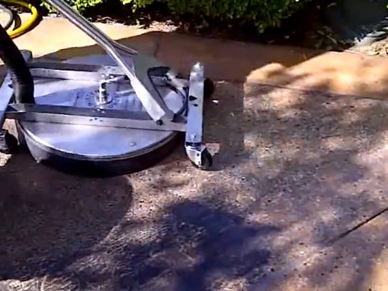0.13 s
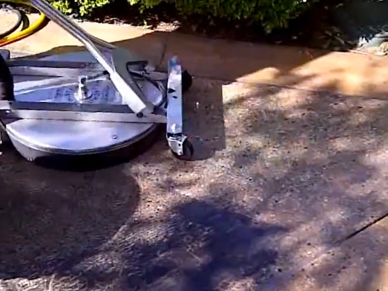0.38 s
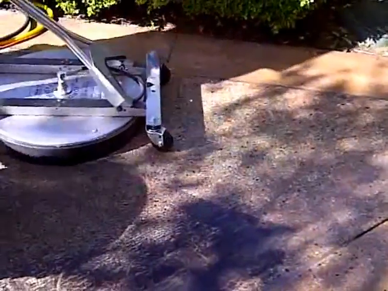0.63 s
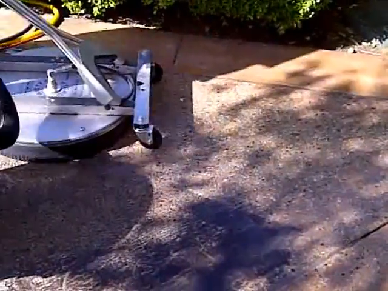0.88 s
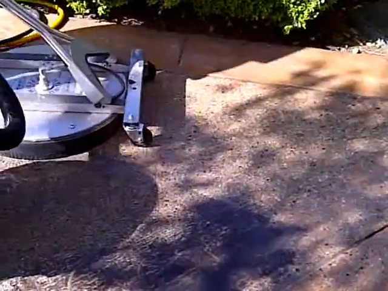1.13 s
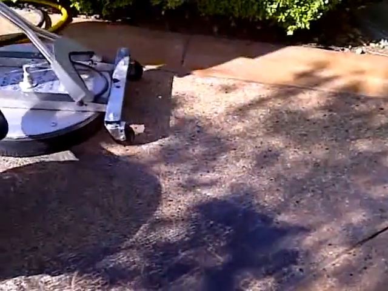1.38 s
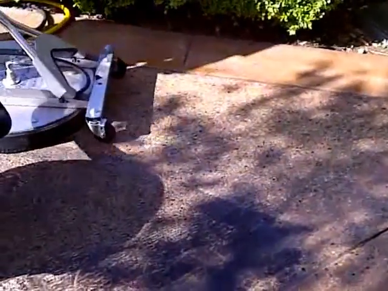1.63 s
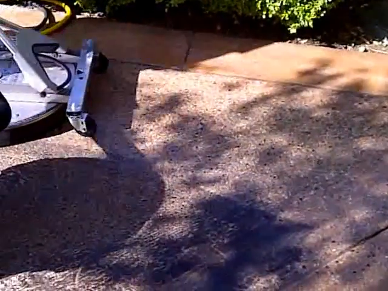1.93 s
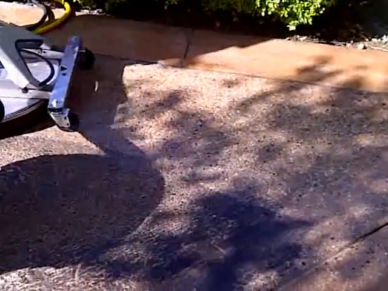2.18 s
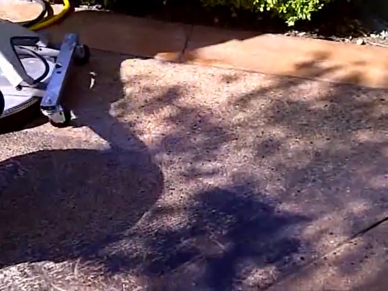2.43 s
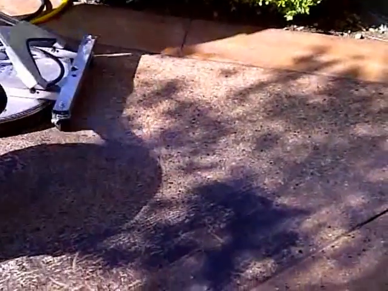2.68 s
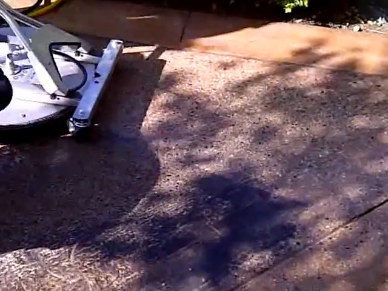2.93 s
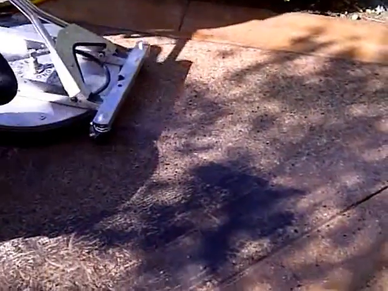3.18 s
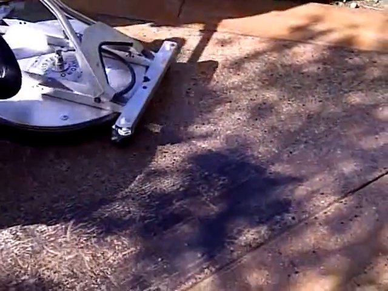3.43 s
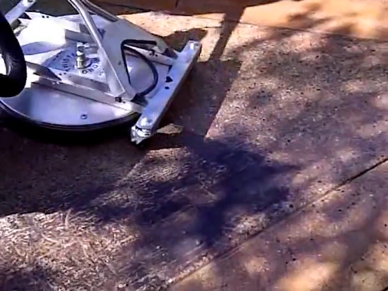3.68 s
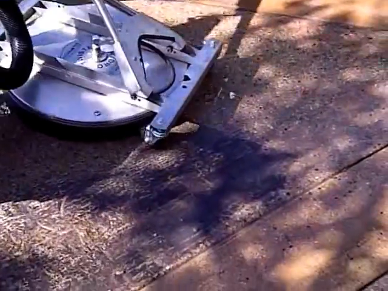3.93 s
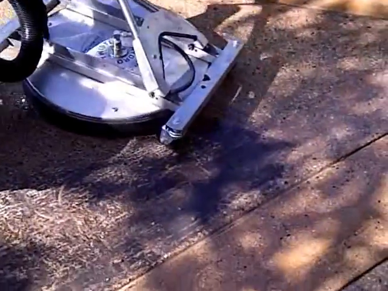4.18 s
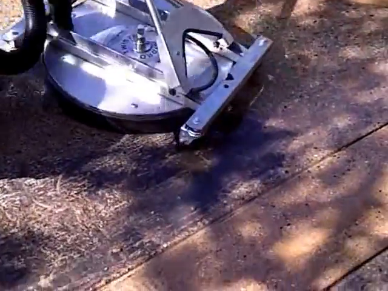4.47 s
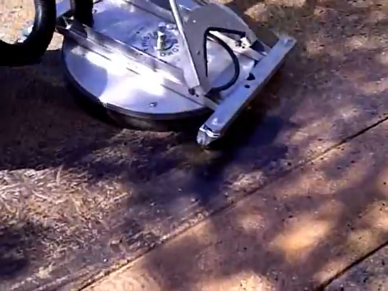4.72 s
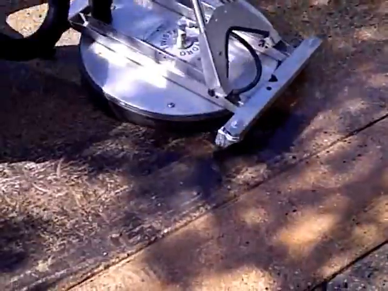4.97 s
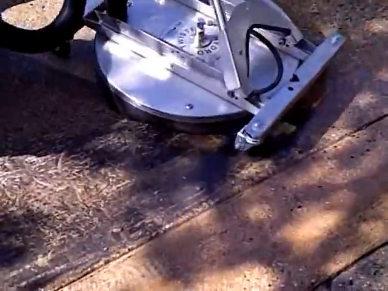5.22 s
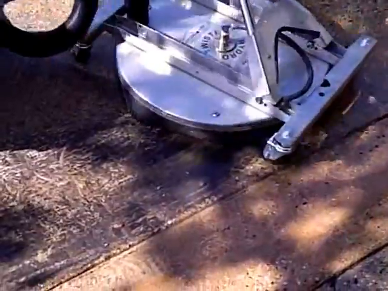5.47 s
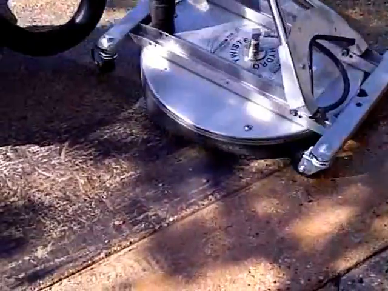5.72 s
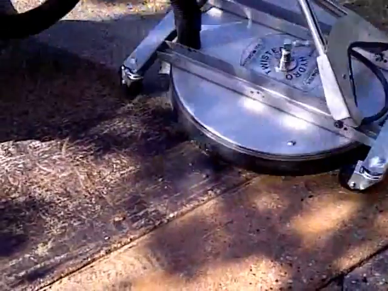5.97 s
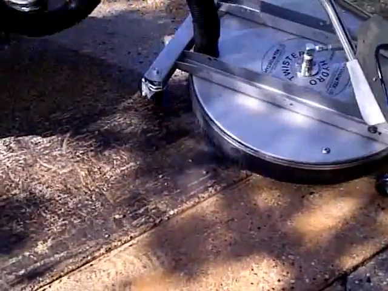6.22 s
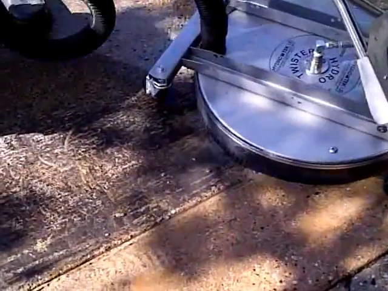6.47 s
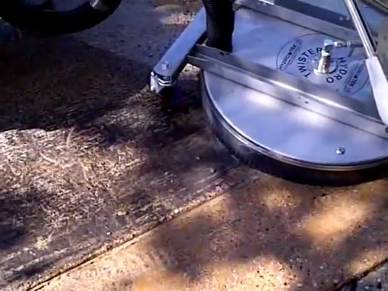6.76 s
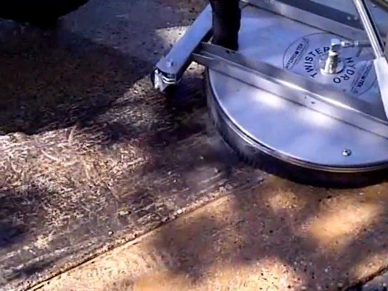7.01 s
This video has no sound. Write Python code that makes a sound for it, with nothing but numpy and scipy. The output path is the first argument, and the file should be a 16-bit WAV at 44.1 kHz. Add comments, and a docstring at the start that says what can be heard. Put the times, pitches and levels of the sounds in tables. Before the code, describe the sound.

Steady engine and pump hum, a loud high mechanical whine and rattle, and smooth covered spray hiss on concrete, the whine sinking near the end.

```python
"""A pressure-washing rig runs outdoors: engine, pump and gears turn in step, so their drone is one stack of
multiples of the engine cycle; a second engine runs at nearly the same speed and beats against it.
A gear mesh whines on the 42nd multiple and rattles its casing; valves clatter above, a few rough hums lie off
the stack, and a covered spray bar hisses over concrete as filtered noise. The listener turns late."""
import sys
import numpy as np
from scipy import signal
from scipy.io import wavfile
from scipy.ndimage import uniform_filter1d

SR = 44100
rng = np.random.default_rng(int(sys.argv[2]) if len(sys.argv) > 2 else 0)


def digitize_waveform(pressure):
    """Quantize a signal to 16-bit integers and store it at the path in sys.argv[1].

    Rows of a 2-D input are taken as channels; values are limited to [-1, 1].
    """
    field = np.atleast_2d(pressure).T
    bounded = np.clip(field, -1, 1)
    quanta = np.round(bounded * 32767).astype(np.int16)
    wavfile.write(sys.argv[1], SR, quanta)


def makeup_ratio(level_db):
    """Linear amplitude ratio for a level in decibels (20 dB per factor of ten)."""
    decades = np.asarray(level_db, float) / 20
    return 10 ** decades


N = 313992
TEETH = 42  # gear meshes per engine cycle


def rms_one(x):
    """Scales a signal to an rms of 1."""
    return x / np.sqrt(np.mean(x ** 2) + 1e-20)


def in_time(rows):
    """Draws straight lines through rows of (time_s, value), one value per sample."""
    time_s, value = np.transpose(rows)
    return np.interp(np.arange(N) / SR, time_s, value)


def band(x, low_hz, high_hz):
    """Band-pass filter."""
    sos = signal.butter(2, [low_hz, high_hz], "band", fs=SR, output="sos")
    return signal.sosfilt(sos, x)


def drift(rate_hz):
    """Slow chance: noise through a double one-pole low-pass, run in; rms 1."""
    hop = 40  # samples per slow step
    r = np.exp(-2 * np.pi * rate_hz * hop / SR)
    noise = rng.standard_normal(N // hop + 2002)
    slow = rms_one(signal.lfilter([1], [1, -2 * r, r * r], noise)[2000:])
    return np.interp(np.arange(N) / hop, np.arange(len(slow)), slow)


def resonate(x, hz, width_hz):
    """Two-pole resonance with gain 1 on top."""
    r = np.exp(-np.pi * width_hz / SR)
    feedback = [1, -2 * r * np.cos(2 * np.pi * hz / SR), r * r]
    return signal.lfilter(np.array([1, 0, -1]) * (1 - r * r) / 2, feedback, x)


def resonant_noise(white, hz, width_hz):
    """Noise twice through one resonance, for steeper flanks."""
    return resonate(resonate(white, hz, width_hz), hz, width_hz)


def engine_cycle():
    """Phase of the engine cycle (rad), shared by all turning parts of the rig."""
    # speed of the rig: time_s, mesh_hz
    speed = [(0.0, 1320.2), (0.4, 1319.4), (0.79, 1317.2), (1.19, 1320.3), (1.58, 1322.4), (1.98, 1318.6),
             (2.37, 1319.4), (2.77, 1317.6), (3.16, 1318.5), (3.56, 1316.6), (3.96, 1321.4), (4.35, 1322.1),
             (4.75, 1318.3), (5.14, 1320.1), (5.54, 1321.8), (5.93, 1319.7), (6.33, 1318.9), (6.72, 1318.0),
             (7.12, 1317.7)]
    return 2 * np.pi * np.cumsum(in_time(speed) / TEETH) / SR


def listener_turn():
    """Share of the turn from the gears (0) to the exhausts (1)."""
    # time_s, share of the turn (0-1)
    turn_points = [(0, 0), (1, 0.1), (3.7, 0), (4.8, 0.2), (5.3, 0.2), (5.8, .6), (6.3, .85), (6.8, 1),
                   (7.12, 0.8)]
    return np.clip(in_time(turn_points), 0, 1)


def turned_db(cycle, turn, k):
    """Change in level (dB) of multiple k as the listener turns, by its average pitch."""
    # what the full turn adds to the tones: pitch_hz, change_db
    turned_tones = [(94, 0.1), (157, 3), (190, -1.3), (220, 3), (283, 2.2), (400, -4), (690, 4), (950, 2.5),
                    (1250, -5), (1400, 0), (1660, -6.5), (1850, 7.5), (2200, -3.5), (2700, 2.5)]
    hz, db = np.transpose(turned_tones)
    pitch_hz = k * cycle[-1] * SR / (2 * np.pi * N)
    return turn * np.interp(np.log(pitch_hz), np.log(hz), db)


def engine(cycle, turn, tones, puffs):
    """Uneven puffs and suctions set the timing of the tones; the muffler lets higher multiples out first."""
    delay_rad, strength = np.transpose(puffs)
    out = np.zeros(N)
    for k, db in tones:
        timing = np.angle(np.sum(strength * np.exp(-1j * k * delay_rad)))
        timing = timing + .1 * drift(5)  # no two strokes are quite alike
        muffler_rad = .07 * (k - 6) ** 2 - .24
        level_db = db + turned_db(cycle, turn, k) + .7 * drift(5.6)
        out += makeup_ratio(level_db) * np.cos(k * cycle + muffler_rad + timing)
    return np.sqrt(2) * out


def first_engine(cycle, turn):
    """The drone: exhaust tones on multiples of the shared cycle."""
    # tones: multiple of the engine cycle, level_db (rms, before the turn and wavering)
    exhaust = [(1, -52), (2, -52), (3, -34.8), (4, -36), (5, -33.5), (6, -33.3), (7, -32.5), (8, -37.7),
               (9, -32), (10, -43), (11, -47), (12, -40), (13, -47), (14, -44), (16, -42.5), (18, -44),
               (20, -50), (21, -52), (22, -50), (25, -49), (26, -48.5), (27, -51), (28, -46), (29, -50)]
    # exhaust puffs within one cycle: delay_rad, strength (below 0 = suction)
    first_puffs = [(0, -1), (.579, -.578), (1.748, 1.113), (3.366, -.381)]
    return engine(cycle + .51, turn, exhaust, first_puffs)


def second_engine(cycle, turn):
    """Hunts about the first engine's speed, so that its tones beat against the drone."""
    # tones: multiple of its own cycle, level_db (rms, before the turn and wavering)
    second_exhaust = [(2, -45.8), (3, -38), (4, -50), (6, -37.7), (7, -51), (8, -42.7), (10, -45.6),
                      (11, -50.5)]
    # exhaust puffs within one cycle: delay_rad, strength (below 0 = suction)
    second_puffs = [(0, -.4), (1.723, -.94), (5.782, -.41), (6.076, .994)]
    # lead over the first engine: time_s, gain in cycles per second
    speed_gains = [(0, .116), (.445, .111), (.89, .428), (1.335, .069), (1.78, .14), (2.225, -.075),
                   (2.67, -.112), (3.115, .093), (3.56, -.024), (4.005, -.173), (4.45, .06), (4.895, .153),
                   (5.34, .014), (5.785, -.049), (6.23, .326), (6.675, .264), (7.12, -.01)]
    lead_rad = 2 * np.pi * np.cumsum(in_time(speed_gains)) / SR
    return engine(cycle + .885 + lead_rad, turn, second_exhaust, second_puffs)


def gear_level():
    """Level of the gear whine over time (dB rms, before flutter)."""
    # time_s, whine_db
    gears = [(0.0, -28), (0.04, -29), (0.1, -23), (0.18, -28), (0.2, -22.5), (0.46, -16.5), (0.55, -18.5),
             (0.61, -16), (0.71, -19), (0.95, -16), (1.66, -19), (1.7, -15), (1.76, -21.5), (1.82, -16),
             (2.58, -14.5), (2.91, -16), (3.25, -14), (3.33, -16.5), (3.84, -17.5), (4.1, -25),
             (4.22, -20.5), (4.58, -21), (5.02, -19.5), (5.06, -26), (5.12, -15), (5.23, -22), (5.25, -19),
             (5.39, -24.5), (5.43, -20), (5.77, -23.5), (6.07, -32), (6.37, -25), (6.48, -31), (6.6, -27.5),
             (7.1, -31), (7.12, -32)]
    return in_time(gears)


def whine(cycle, level_db):
    """The mesh tone, one sine a tooth, fluttering slightly in the open air."""
    flutter_db = 0.65 * drift(19.0)
    jitter_rad = 0.1 * drift(6.9)
    return np.sqrt(2) * makeup_ratio(level_db + flutter_db) * np.sin(TEETH * cycle + jitter_rad)


def stack(cycle, turn, tones, waver_db, waver_hz):
    """Sines on multiples of the cycle, unrelated in phase, each wavering on its own."""
    out = np.zeros(N)
    for k, db in tones:
        level_db = db + turned_db(cycle, turn, k) + waver_db * drift(waver_hz)
        out += makeup_ratio(level_db) * np.sin(round(k) * cycle + rng.uniform(0, 2 * np.pi))
    return np.sqrt(2) * out


def casing(cycle, turn, whine_db):
    """Tooth errors repeat every cycle as side tones; loose rattle fills the casing's resonances."""
    # side tones about the mesh: multiple of the engine cycle, level_db (relative)
    side_tones = [(30, -47.6), (31, -40.3), (35, -44.8), (36, -39.1), (37, -36.4), (38, -37.8), (39, -39.3),
                  (40, -32.4), (43, -43.0), (44, -38.0), (45, -42.0), (46, -38.6), (47, -40.5), (48, -41.5),
                  (49, -47.8), (50, -36.8), (51, -41.5), (52, -42.1), (53, -35.9), (55, -44.2), (56, -49.9),
                  (57, -49.4), (58, -45.7), (59, -49.7)]
    # resonances of the casing: pitch_hz, width_hz (of each pass), level_db (relative)
    casing_modes = [(1149, 300, -1.5), (1286, 310, 0.5), (1607, 120, -2)]
    tones = rms_one(stack(cycle, turn, side_tones, waver_db=2.5, waver_hz=6.4))
    white = rng.standard_normal(N)
    rattle = np.zeros(N)
    for i, (hz, width_hz, db) in enumerate(casing_modes):
        sign = (-1) ** i  # neighbouring modes swing in opposite senses
        rattle += sign * makeup_ratio(db) * resonant_noise(white, hz, width_hz)
    both = tones + makeup_ratio(-0.5) * rms_one(rattle)
    # the casing follows the smoothed whine with a share of its swing
    smooth_s, follows = .4, 0.28
    slow_db = uniform_filter1d(whine_db, int(smooth_s * SR))
    level_db = -26 + follows * (slow_db + 17.5)
    # this level is that of the part between 1000 and 1280 Hz
    return makeup_ratio(level_db) * both / np.std(band(both, 1000, 1280))


def clatter(cycle, turn):
    """Valve clatter: a dense stack of high multiples of the engine cycle."""
    # multiple of the engine cycle, level_db (rms, before the turn and wavering)
    valve_tones = [(60, -51.9), (61, -45.6), (62, -51.3), (63, -53.1), (64, -52.3), (65, -52.9),
                   (67, -47.1), (70, -47.5), (72, -53.9), (73, -52.6), (74, -54.6), (75, -50.8),
                   (76, -53.1), (77, -51.0), (78, -47.1), (79, -53.8), (80, -50.9), (81, -52.9),
                   (82, -53.9), (84, -53.2), (86, -50.9), (87, -55.2), (88, -58.4), (89, -58.6),
                   (90, -56.7), (91, -59.7), (92, -59.0), (94, -60.6), (95, -59.0), (96, -60.6),
                   (97, -59.0), (102, -61.8)]
    return stack(cycle, turn, valve_tones, waver_db=2.0, waver_hz=1.4)


def hums():
    """Rough hums off the stack: noise twice through narrow resonances."""
    # pitch_hz, width_hz (of each pass), level_db (rms)
    hum_modes = [(107.4, 15, -42.5), (352, 3.2, -41.5), (353.8, 7.6, -46), (1047.5, 14, -39)]
    out = np.zeros(N)
    for hz, width_hz, db in hum_modes:
        white = rng.standard_normal(N)
        out += makeup_ratio(db) * rms_one(resonant_noise(white, hz, width_hz))
    return out


def spray(turn):
    """Smooth jet noise in third-octave bands, each flickering a little and swelling at times."""
    # colour of the hiss: pitch_hz, density_db (relative, per Hz)
    spray_colour = [(22, -10), (50, -18.5), (75, -3), (140, 1), (200, 4), (330, 2.5), (520, 3), (800, -2),
                    (1100, 3), (1800, -2), (2400, 1), (2900, -8.5), (3600, -8), (4600, -10.5),
                    (5800, -14.5), (7300, -19)]
    # what the full turn adds to the spray: pitch_hz, change_db
    turned_spray = [(250, 3.8), (400, -5.5), (800, 7.5), (1300, -1.3), (2000, 4), (2550, -6), (3200, -2),
                    (4000, 0)]
    # brief swells in one region or another: peak_s, rise_db, half_length_s, pitch_hz
    swells = [(0.096, 3.5, 0.46, 403), (3.9, 4, 0.37, 598), (4.0, 9.5, 0.22, 1547), (4.193, 7, 0.57, 394),
              (5.499, 6, 0.8, 397), (5.385, 6.5, .06, 1087), (5.8, 3.5, .5, 2750), (6.697, 2, .4, 750)]
    # level of the part between 1800 and 7000 Hz: time_s, level_db (rms)
    spray_level = [(0, -30.5), (1, -31), (2, -32), (3, -32), (3.7, -31.5), (4.8, -32.5), (5.5, -32.5),
                   (6.3, -32.5), (6.8, -32), (7.12, -33)]
    hz, db = np.transpose(spray_colour)
    turn_hz, turn_db = np.transpose(turned_spray)
    time_s = np.arange(N) / SR
    swells_db = [rise_db * np.exp(-((time_s - peak_s) / half_s) ** 2)
                 for peak_s, rise_db, half_s, _ in swells]
    swell_pitch = np.log(np.transpose(swells)[3])

    white = rng.standard_normal((2, N))  # neighbouring bands take separate noises
    out = np.zeros(N)
    edges_hz = 20 * 2 ** (np.arange(28) / 3)
    for k, (low, high) in enumerate(zip(edges_hz, edges_hz[1:])):
        centre = np.log(low * high) / 2
        colour_db = np.interp(centre, np.log(hz), db)
        colour_db = colour_db + turn * np.interp(centre, np.log(turn_hz), turn_db)
        reach = np.exp(-((centre - swell_pitch) / 0.17) ** 2)  # share of each swell in this band
        flicker_db = 1.14 * drift(7.1)
        out += makeup_ratio(colour_db + reach @ swells_db + flicker_db) * band(white[k % 2], low, high)
    return makeup_ratio(in_time(spray_level)) * out / np.std(band(out, 1800, 7000))


def scene():
    """Mixes the rig, whose turning parts follow one engine cycle, with the spray."""
    cycle, turn, whine_db = engine_cycle(), listener_turn(), gear_level()
    rig = first_engine(cycle, turn) + second_engine(cycle, turn)
    rig += whine(cycle, whine_db)
    rig += casing(cycle, turn, whine_db)
    rig += clatter(cycle, turn) + hums()
    return (rig + spray(turn))[None]


def low_pass(x):
    """Removes everything above the highest recorded frequency."""
    return signal.sosfilt(signal.butter(12, 7700, fs=SR, output="sos"), x)


def record(dry):
    """A narrow-band microphone path: the treble rolls off, then is cut steeply."""
    roll_off_hz, cutoff_hz = 6850, 7900
    dull = signal.sosfilt(signal.butter(12, roll_off_hz, fs=SR, output="sos"), dry)
    narrow = signal.sosfilt(signal.cheby2(20, 60, cutoff_hz, fs=SR, output="sos"), dull)
    return low_pass(narrow)


dry = scene()
out = record(dry)
digitize_waveform(out)
```